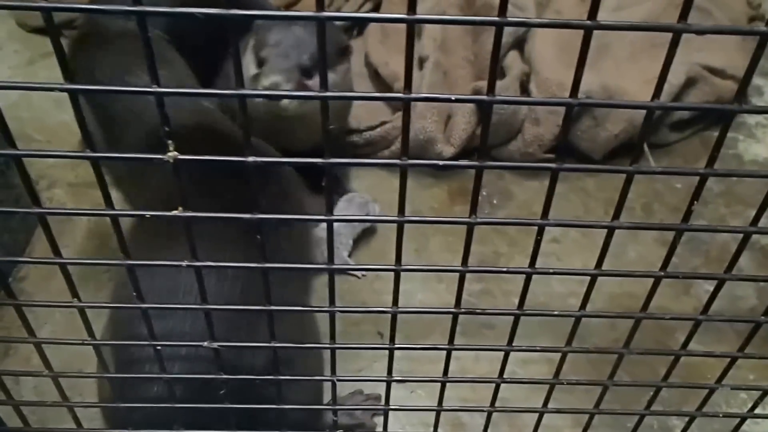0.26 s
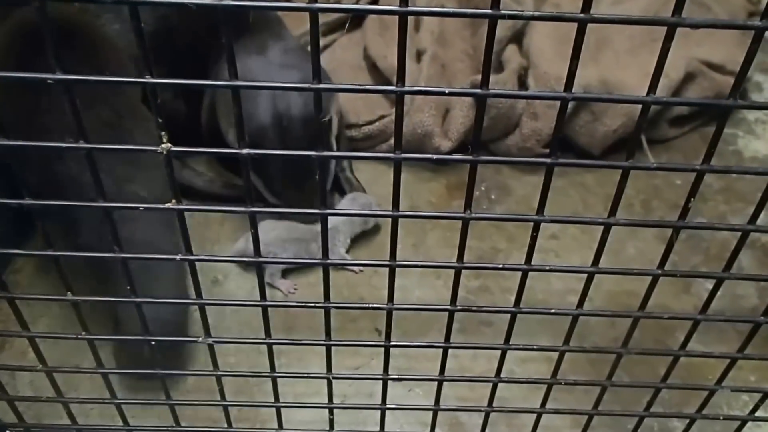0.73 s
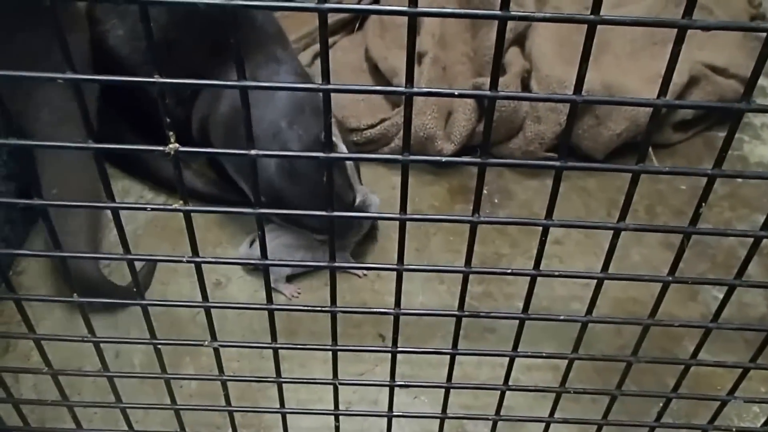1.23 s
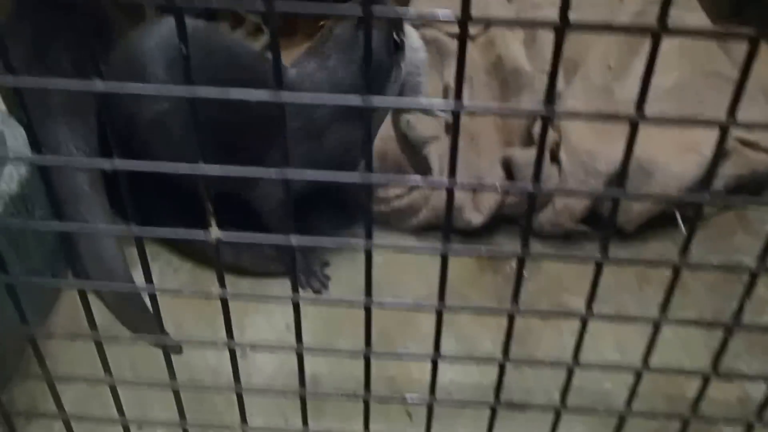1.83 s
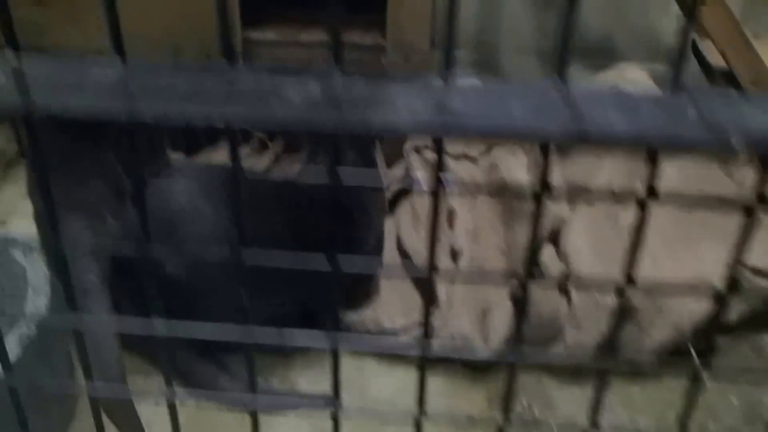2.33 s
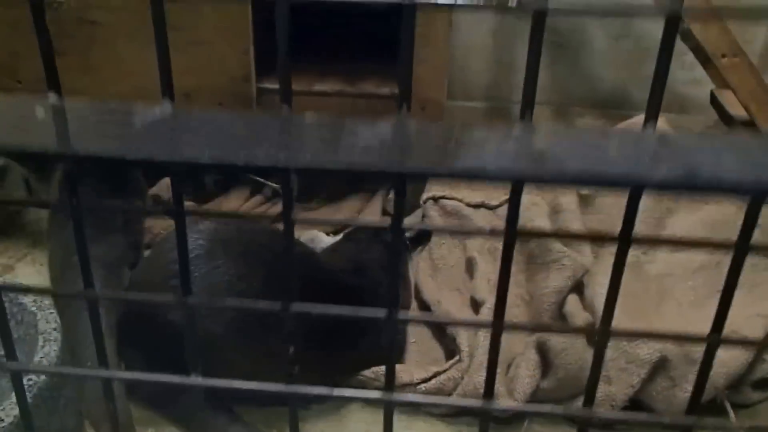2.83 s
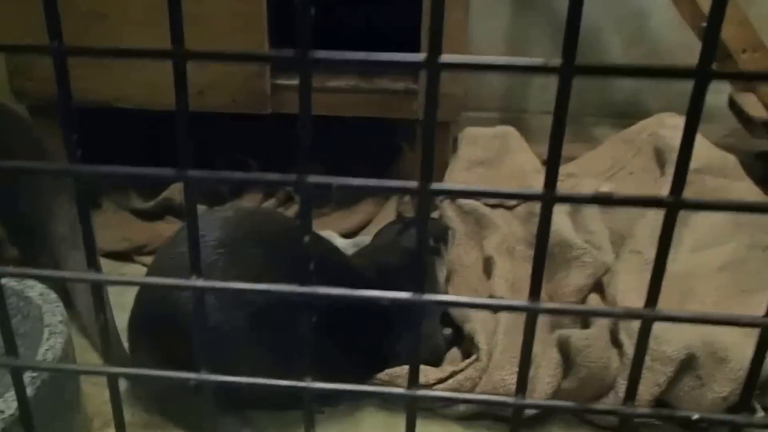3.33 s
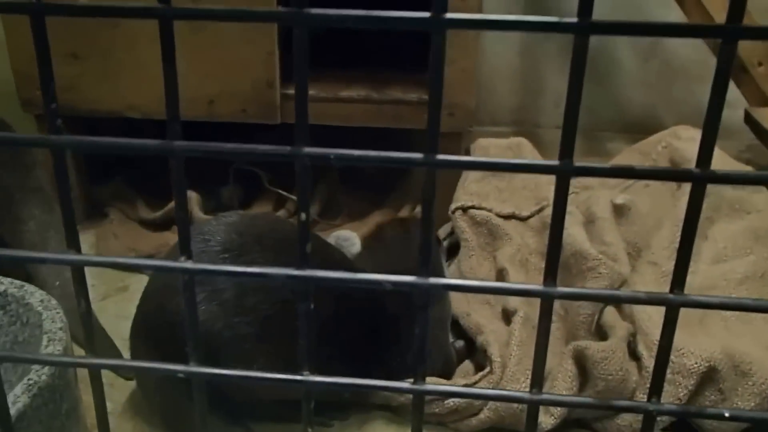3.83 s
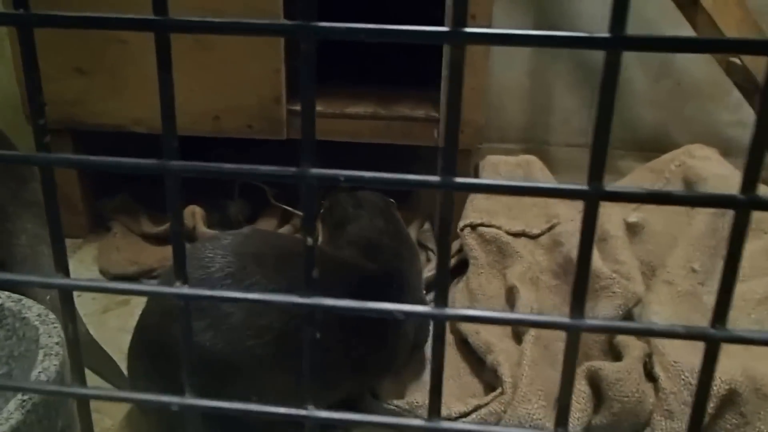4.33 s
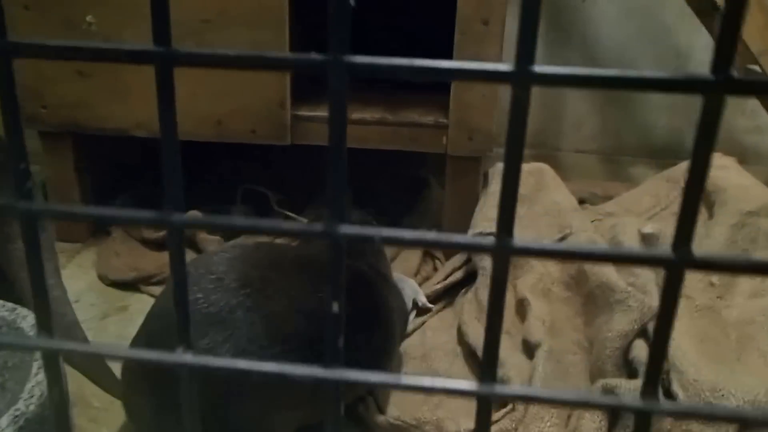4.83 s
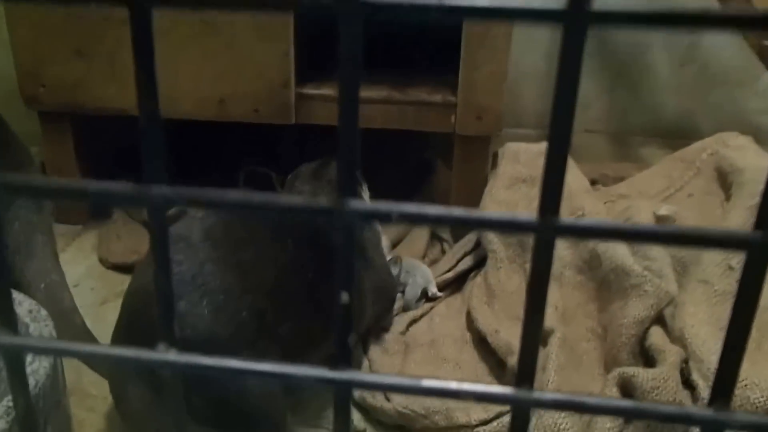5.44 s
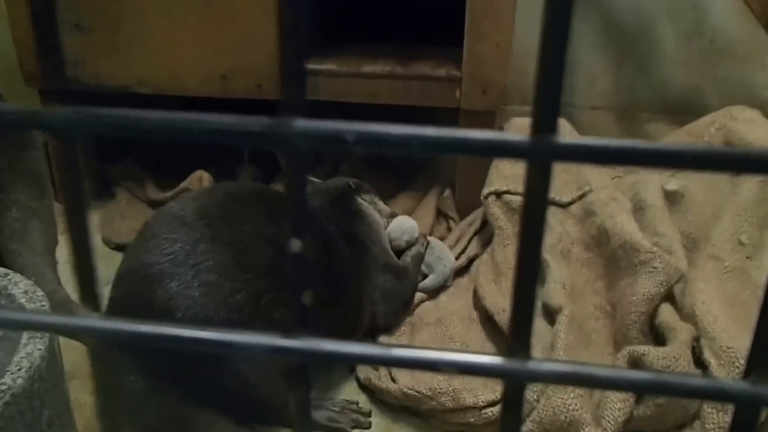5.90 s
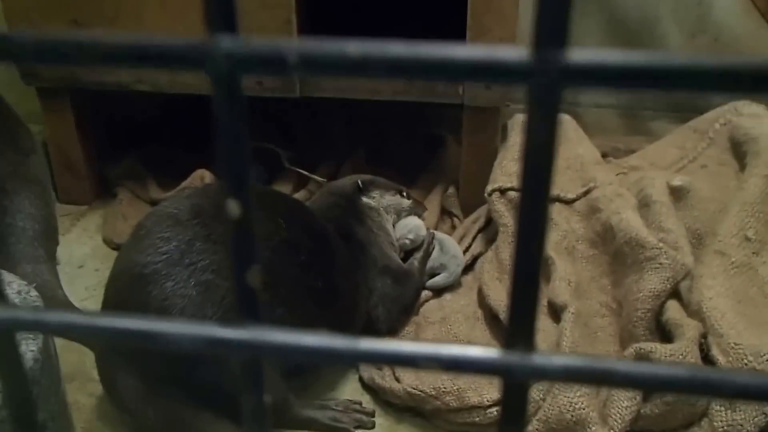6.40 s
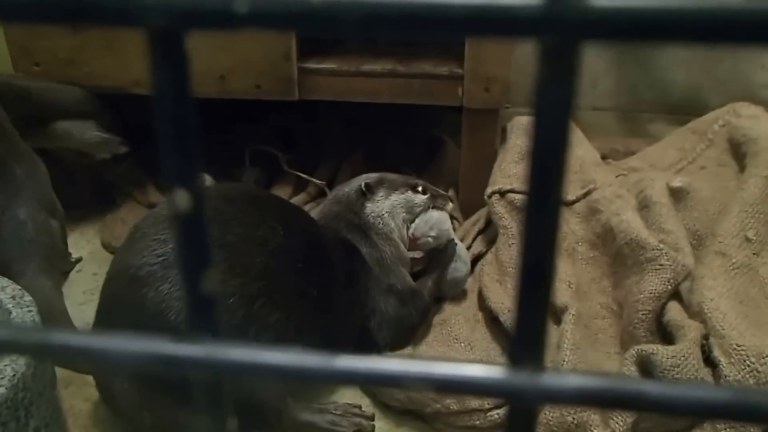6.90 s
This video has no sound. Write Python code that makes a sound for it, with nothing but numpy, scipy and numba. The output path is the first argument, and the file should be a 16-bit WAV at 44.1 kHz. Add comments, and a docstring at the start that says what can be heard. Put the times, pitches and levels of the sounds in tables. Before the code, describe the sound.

Otters beg with overlapping shrill whistles and raspy screams in a small concrete pen; a heavy door bangs shut over humming ventilation.

```python
"""Otters beg in a small concrete pen; the hard walls ring briefly, ventilation hums throughout.
From the start, overlapping cries: a shrill arched whistle breaks into a rasp, sinks to a nasal scream.
Near 2.1 s a hoarse squeak; at 2.3 s a heavy door knocks, then bangs shut from 2.6 s.
From 3 s on, soft held tones: low whimpers near 1.3 kHz and single scream overtones ringing out.
Gain control ducks under each loud cry; hum and a shrill hiss swell back in the pauses."""
import sys
import numpy as np
from scipy import signal
from scipy.fft import rfft, irfft, next_fast_len
from scipy.io import wavfile
from numba import njit

SR = 44100
rng = np.random.default_rng(int(sys.argv[2]) if len(sys.argv) > 2 else 0)


def generate_wav(signal):
    """Clip the signal to [-1, 1] and save it as 16-bit WAV at the path in sys.argv[1]."""
    frames = np.transpose(np.atleast_2d(signal))
    scaled = np.clip(frames, -1, 1) * 32767
    pcm = np.round(scaled).astype(np.int16)
    wavfile.write(sys.argv[1], SR, pcm)


N = 315756
TIME_S = np.arange(N) / SR
TOP_HZ = 15850

# ventilation spectrum: freq_hz, gain_db
VENT_SPECTRUM = [(15, -45), (25, -15), (70, -0.5), (86, 1.5), (102, -24), (138, -2), (209, -7.5),
                 (387, -4.5), (548, -12.5), (776, -7), (1100, -14), (1430, -8), (2420, -120)]
# door blows: start_s, level_db, contact_cutoff_hz, t60_s
DOOR_BLOWS = [(2.298, -25.5, 686, 0.36), (2.632, -5, 3600, 0.28), (2.678, -9, 2400, 0.3),
              (2.712, -6.5, 1230, 0.25), (2.752, -17, 600, 0.45)]
# door spectrum: freq_hz, gain_db
DOOR_SPECTRUM = [(24, -36), (40, -13), (202, -10), (280, 0), (327, -7.5), (539, -4), (1260, -8.5),
                 (1330, -9.5), (2770, -6.5), (4000, -8), (5200, -10), (8800, -120)]
# door panel modes: freq_hz, gain_db, t60_s
PANEL_MODES = [(57.5, -7.5, 2.5), (112.7, -7, 2.14), (183.5, -3.5, 1.2), (254, -16, 0.68), (285, -16, 0.6),
               (358, -16, 0.85), (457, -3.5, 0.7), (559.6, -4, 0.3), (580, -15, .55), (710, -11, 0.39),
               (910, -13, 0.6), (1286, -4, 0.54), (2020, -9, 0.24)]
# squeak envelope: time_s, level_db
SQUEAK_ENVELOPE = [(2.068, -39), (2.148, -22), (2.28, -36)]
# squeak resonances: freq_hz, width_hz, gain_db
SQUEAK_RESONANCES = [(2260, 88, 1.8), (2770, 104, 1.3), (3200, 82, 1.9)]
# held tones (low whimpers, high scream overtones): start_s, end_s, pitch_hz, level_db
HELD_TONES = [(3.003, 3.289, 1360, -44), (3.66, 3.779, 6470, -23.5), (6.218, 6.318, 6060, -27),
              (6.269, 6.371, 1416, -44), (6.401, 6.509, 1305, -32.5), (6.757, 6.903, 1317, -43.5),
              (6.93, 7.022, 1316, -33.5), (7.047, 7.152, 3773, -34)]
# whistles: crest_s, rise_s, fall_s, start_hz, crest_hz, crest_db, fall_swell_db, octave_db
WHISTLE_ARCHES = [(.33, 0.067, 0.055, 5250, 8770, -18.5, 0.5, 3),
                  (0.346, 0.056, .08, 7940, 8730, -23.5, 18, -12),
                  (.432, 0.055, .091, 3200, 8400, -1, -1.5, 1.5),
                  (.869, .036, 0.084, 5920, 8250, -17.5, 0, -12),
                  (1.233, 0.053, 0.054, 7550, 8900, -21, 9, -3),
                  (1.244, 0.029, .11, 5140, 9090, -23, 14.5, -4),
                  (1.591, 0.06, 0.077, 6120, 8970, -22, 10, -10),
                  (1.646, 0.032, 0.066, 5040, 8430, -13, -1.5, 1.5),
                  (1.822, 0.053, 0.085, 8320, 8710, -18, 5.5, 1),
                  (2.049, 0.039, 0.092, 5100, 8830, -17, 5, -16),
                  (2.173, 0.077, 0.072, 3670, 8300, -20.5, 19.5, -10),
                  (2.694, 0.038, 0.11, 8600, 8790, -24, 13, -10),
                  (2.736, 0.066, .084, 5000, 7890, -18.5, 9.5, -8),
                  (2.826, .038, 0.072, 6130, 8340, -16.5, 1, -3),
                  (3.001, 0.051, 0.07, 3960, 8930, -16, 2.5, -14),
                  (3.181, 0.056, 0.1, 4460, 8210, -17, 9, -3),
                  (3.296, 0.021, 0.11, 6706, 8760, -13, 6.5, -20),
                  (3.995, 0.041, 0.08, 8100, 8470, -17, 11.5, 2.5),
                  (4.014, 0.045, .16, 4610, 8990, -9, 6.5, 1),
                  (4.305, .022, 0.027, 5550, 5923, -9.5, -8, 7),
                  (4.604, 0.051, .081, 5927, 8370, -13, 2, -0.5),
                  (4.659, 0.061, 0.061, 8150, 8940, -19, 6, -1),
                  (4.753, 0.047, .14, 8440, 8420, -15.5, -1.5, 0),
                  (4.887, 0.065, .12, 5210, 8144, -11, 3.5, -6),
                  (5.141, 0.042, .064, 6780, 8800, -15, 3, -18),
                  (5.246, 0.023, 0.053, 6840, 8160, -25, 22.5, -19),
                  (5.669, 0.031, 0.14, 8440, 8540, -13, 7, 5.5),
                  (5.716, 0.034, 0.071, 4910, 7460, -11, 5, 0),
                  (6.485, .072, 0.057, 3560, 8220, -5.5, 1.5, 4.5),
                  (6.915, 0.051, 0.074, 4050, 8220, -15, 5.5, -10)]
# otter throat and mouth response: freq_hz, gain_db
THROAT_SPECTRUM = [(500, -62), (900, -21), (1500, -12), (2300, -12.5), (3300, -8.5), (4200, -10.5),
                   (5200, -2.5), (6200, 2.5), (7300, -1.5), (8300, -6), (9300, -5), (10500, -1),
                   (11700, -1), (13500, -11), (15600, -18)]
# screams: start_s, end_s, open_hz, body_hz, end_hz, level_db, change_db, rasp_share, bright_db
SCREAM_CRIES = [(0, 0.201, 1085, 1130, 692, -10.5, -11.5, 0.32, 5.5),
                (0.516, 0.729, 2260, 1440, 1437, -2.5, -6.5, 0.9, 7.5),
                (0.713, 1.154, 1806, 1214, 897.5, -3.5, -18, 0.47, 8),
                (1.281, 1.78, 4515, 1922, 1361, -17, -3.5, .95, 3),
                (1.4, 1.597, 1383, 1410, 1660, -27, 3, 0.77, -10),
                (1.894, 2.33, 2380, 1830, 1112, -15.5, 2, 1, 5),
                (2.219, 2.446, 1578, 1692, 1612, -18.5, -2, 0.92, -0.5),
                (2.35, 2.637, 1151, 1135, 1190, -26.5, 7, 1, -1.5),
                (2.439, 2.65, 1711, 1726, 1644, -19, 0.5, 0.86, -4.5),
                (2.771, 3.276, 2302, 1503, 1335, -17, -5, .85, 10),
                (3.05, 3.303, 2390, 1774, 1275, -19.5, 2, 0.77, 6.5),
                (3.261, 3.56, 3173, 1796, 1430, -9, -14.5, 0.97, 4.5),
                (3.301, 3.804, 1242, 1475, 1020, -12, -10, .68, 9.5),
                (3.401, 4.092, 2856, 1868, 1421, -22.5, 3, .72, 3),
                (3.768, 3.95, 1162, 1083, 1188, -16.5, -23, 0.67, 1.5),
                (4.059, 4.195, 5180, 2023, 1202, -21, 4, 0.28, 5),
                (4.101, 4.389, 3203, 2375, 1764, -7, -1, 1, 8.5),
                (4.38, 4.659, 1332, 1495, 842, -13, -4.5, 0.7, 7.5),
                (4.554, 4.941, 2144, 1810, 1327, -20, -4, 0.8, 1),
                (4.663, 4.749, 5150, 3070, 1466, -20, 7, .4, 6),
                (4.878, 5.102, 2402, 1692, 1642, -15.5, 9, 0.91, 12.5),
                (5.059, 5.447, 1800, 1531, 1421, -8.5, -4.5, 0.79, 10),
                (5.358, 5.688, 2010, 1758, 1170, -24, -6, 0.65, -6),
                (5.753, 5.969, 3127, 1642, 1365, -11, 8, 0.99, 7),
                (5.953, 6.253, 1527, 1100, 895.5, -7.5, -19, 0.54, 4.5),
                (5.985, 6.424, 2360, 1980, 1284, -26, -1, 0.78, -3.5),
                (6.535, 6.89, 2884, 1292, 840.6, -2, -33, .7, 7.5),
                (6.962, 7.17, 3133, 1774, 1782, -19, -6.5, 0.49, 0),
                (6.979, 7.16, 1386, 1416, 910, -18, -13, 0.62, 6)]
# pushes of effort in a scream: centre_s, half_length_s, pitch_lift_share, lift_db
EFFORT_SURGES = [(0.121, .015, .06, 4.5), (0.686, 0.024, .16, 3), (1.02, 0.038, .06, -2),
                 (1.475, 0.034, .11, -1), (2.517, 0.033, .17, 0.5), (3.62, .06, 0.037, 2),
                 (4.498, 0.035, .06, 0), (5.281, 0.02, .08, 0), (5.965, 0.016, .06, -2),
                 (6.635, .027, .19, 2.5)]


def undb(db):
    """Decibels to gain."""
    return 10 ** (np.asarray(db) / 20)


def unit(x):
    """Scale to rms 1."""
    return x / np.sqrt(np.mean(x ** 2) + 1e-20)


def colour(x, points):
    """Filter by (freq_hz, gain_db) points; white noise keeps its power."""
    hz, db = np.transpose(points)
    size = next_fast_len(len(x) + 2048)
    bins_hz = np.maximum(np.fft.rfftfreq(size, 1 / SR), 1)
    gain = unit(undb(np.interp(np.log(bins_hz), np.log(hz), db)))
    return irfft(rfft(x, size) * gain, size)[:len(x)]


def lowpass(x, hz, order=2):
    """Butterworth low-pass."""
    return signal.sosfilt(signal.butter(order, hz, fs=SR, output="sos"), x)


def zero_phase_lowpass(x, hz, order):
    """Low-pass forward, then backward."""
    return lowpass(lowpass(x, hz, order)[::-1], hz, order)[::-1]


def wander(t, rate_hz):
    """Gaussian random values joined by lines."""
    return np.interp((t - t[0]) * rate_hz, np.arange(len(t)), rng.standard_normal(len(t)))


def span(start_s, end_s, fade_s):
    """Sample times and soft-edged gate of an event."""
    t = TIME_S[(TIME_S >= start_s - fade_s / 2) & (TIME_S <= end_s + fade_s / 2)]
    edge_s = np.minimum(t - start_s, end_s - t)
    return t, np.sin(np.pi / 2 * np.clip(edge_s / fade_s + .5, 0, 1)) ** 2


def add(out, start_s, x):
    """Mix x into out from start_s."""
    i = int(round(start_s * SR))
    out[i:i + len(x)] += x[:len(out) - i]


def ventilation(air_db=-41, hum_db=-45, hum_hz=136):
    """Soft rushing air plus a wavering hum."""
    air = colour(rng.standard_normal(N), VENT_SPECTRUM) * undb(air_db + wander(TIME_S, 13))
    hum = np.sin(2 * np.pi * hum_hz * TIME_S + 2.2 * wander(TIME_S, 22))
    return air + hum * undb(hum_db + 2 * wander(TIME_S, 12))


def background_hiss(level_db=-35, swell_db=2):
    """Steady shrill hiss, coloured like the screams, gently swelling."""
    hiss = colour(rng.standard_normal(N), THROAT_SPECTRUM)
    return hiss * undb(level_db + swell_db * wander(TIME_S, 8.9))


def door(ring_db=-17, boom_db=-25, boom_hz=300, boom_t60_s=2.09):
    """Per blow: dense clatter, ringing panel modes, long low boom."""
    out, t = np.zeros(N), TIME_S[:int(1.5 * SR)]

    def burst(cutoff_hz, t60_s):
        noise = colour(rng.standard_normal(len(t)), DOOR_SPECTRUM)
        return unit(lowpass(noise, cutoff_hz)) * undb(-60 * t / t60_s)

    for start_s, level_db, contact_hz, t60_s in DOOR_BLOWS:
        clatter = burst(contact_hz, t60_s)
        ring = np.zeros(len(t))
        for hz, gain_db, mode_t60_s in PANEL_MODES:
            phase = 2 * np.pi * (hz * t + rng.random()) + .6 * wander(t, 25)
            ring += undb(gain_db - 60 * t / mode_t60_s) * np.sin(phase)
        ring *= undb(ring_db) / np.std(ring[:SR // 10])
        boom = undb(boom_db) * burst(boom_hz, boom_t60_s)
        add(out, start_s, undb(level_db) * (clatter + ring + boom))
    return out


def squeak():
    """Short hoarse note in a few narrow resonances."""
    out, note = np.zeros(N), 0
    time_s, level_db = np.transpose(SQUEAK_ENVELOPE)
    t, gate = span(time_s[0], time_s[-1], fade_s=.026)
    for hz, width_hz, gain_db in SQUEAK_RESONANCES:
        phase = 2 * np.pi * np.cumsum(hz + width_hz * wander(t, 720)) / SR
        note += undb(gain_db) * np.sin(phase)
    add(out, t[0], unit(note) * gate * undb(np.interp(t, time_s, level_db)))
    return out


def held_tones(quiver_share=.0182, sink_share=.0297, octave_db=-7, trim_db=1):
    """Low whimpers and single scream overtones ringing out: slowly sinking sine plus octave."""
    out = np.zeros(N)
    for start_s, end_s, pitch_hz, level_db in HELD_TONES:
        t, gate = span(start_s, end_s, fade_s=.03)
        progress = (t - start_s) / (end_s - start_s)
        glide = 1 + sink_share * (.5 - progress) + quiver_share * wander(t, 49.5)
        phase = 2 * np.pi * np.cumsum(pitch_hz * glide) / SR
        note = np.sin(phase) + undb(octave_db) * np.sin(2 * phase)
        add(out, t[0], np.sqrt(2) * note * gate * undb(level_db + trim_db))
    return out


def whistles(break_hz=5890, foot_hz=5400, rise_db_per_khz=1.54, shimmer_db=2.5, halo_db=-15):
    """Arches up to a crest, down to the voice break; pure on top, hoarse on the slopes."""
    out = np.zeros(N)
    for crest_s, rise_s, fall_s, start_hz, crest_hz, crest_db, swell_db, octave_db in WHISTLE_ARCHES:
        t, gate = span(crest_s - rise_s, crest_s + fall_s, fade_s=.014)
        rise_left = np.maximum(crest_s - t, 0) / rise_s
        fall = np.maximum(t - crest_s, 0) / fall_s
        slope = rise_left + fall
        drop = (np.sin(fall) / np.sin(1)) ** 2
        climb_hz = crest_hz - start_hz
        hz = crest_hz - climb_hz * rise_left ** 2.5 - (crest_hz - break_hz) * drop
        hz *= 1 + (.005 + .014 * slope) * wander(t, 1100) + .007 * wander(t, 110)
        phase = 2 * np.pi * np.cumsum(hz) / SR
        halo = wander(t, 1800) * np.sin(phase) + wander(t, 1800) * np.cos(phase)  # noise round the pitch
        halo *= undb(halo_db) * (.5 + 2 * slope)
        octave_gain = undb(octave_db - 12 * rise_left) / np.sqrt(1 + (2 * hz / 13500) ** 16)
        note = np.sin(phase) + octave_gain * np.sin(2 * phase) + halo
        db = crest_db - rise_db_per_khz * climb_hz / 1000 * rise_left + swell_db * drop
        db += shimmer_db * wander(t, 159)
        mouth = 1 / np.sqrt(1 + (foot_hz / hz) ** 16)  # a small mouth radiates the low foot poorly
        add(out, t[0], np.sqrt(2) * note * mouth * gate * undb(db))
    return out


def harmonics(t, hz, phase, strain_db=-5):
    """Scream partials; each fades and smears on its own as the head turns among the walls."""
    stack = np.zeros(len(t))
    for k in range(1, int(TOP_HZ / hz.min()) + 1):
        gain = undb(4.5 * wander(t, 28) - 1.5)
        smear_rad = k * hz / 9000 * wander(t, 240)
        if k == 1:  # a strained, high voice loses fundamental
            gain *= undb(strain_db * np.clip((hz - 1300) / 700, 0, 1))
        stack += gain * np.cos(k * phase + smear_rad) * (k * hz < TOP_HZ + 1000)
    return stack * 2 * np.sqrt(hz / SR)  # scaled to the power per Hz of white noise


def screams(drop_s=.05, clear_s=.0582, shimmer_db=2, hiss_hz=4600, split_hz=9000):
    """Gliding harmonic cries, harsh at onset; rasp makes cycles uneven and lets air hiss through."""
    out = np.zeros(N)
    for start_s, end_s, open_hz, body_hz, end_hz, level_db, change_db, held_rasp, bright_db in SCREAM_CRIES:
        t, gate = span(start_s, end_s, fade_s=.05)
        age_s = np.maximum(t - start_s, 0)
        progress = age_s / (end_s - start_s)
        hz = body_hz * (end_hz / body_hz) ** progress + (open_hz - body_hz) * np.exp(-age_s / drop_s)
        hz *= 1 + .011 * wander(t, 30)
        db = level_db + change_db * progress ** 2.18
        for centre_s, half_s, lift_share, lift_db in EFFORT_SURGES:
            push = np.exp(-((t - centre_s) / half_s) ** 2)
            hz *= 1 + lift_share * push
            db += lift_db * push
        rasp = held_rasp + (1 - held_rasp) * np.exp(-age_s / clear_s)
        rasp = np.clip(rasp + .12 * wander(t, 18), 0, 1) ** 3
        jitter = (.006 + .028 * rasp) * wander(t, 1100)
        wobble = (.005 + .012 * rasp) * wander(t, 60)
        phase = 2 * np.pi * np.cumsum(hz * (1 + jitter + wobble)) / SR
        tone = harmonics(t, hz, phase)
        tone *= 1 + .65 * rasp * wander(t, 300) * np.cos(phase / 2)  # cycles alternate in strength
        hiss = unit(rng.standard_normal(len(t)) * (1 + np.cos(phase)))
        hiss -= .39 * zero_phase_lowpass(hiss, hiss_hz, order=3)
        voice = np.sqrt(1 - .65 * rasp) * tone + (.13 + .5 * rasp) * hiss
        # a wider mouth favours the upper resonance
        low = zero_phase_lowpass(voice, split_hz, order=4)
        voice = low * undb(-bright_db / 2) + (voice - low) * undb(bright_db / 2)
        add(out, t[0], voice * gate * undb(db + shimmer_db * wander(t, 140)))
    return colour(out, THROAT_SPECTRUM)


def pen(x, echoes_db=-7, tail_db=-13, t60_s=1.0, echo_count=12):
    """Sharp echoes off floor and near walls, plus a short diffuse tail."""
    t = TIME_S[:SR * 3 // 4]
    response = np.zeros(len(t))
    lags = (SR * (.002 + .012 * rng.random(echo_count))).astype(int)
    response[lags] = undb(echoes_db) * rng.choice([-1, 1], echo_count) / np.sqrt(echo_count)
    noise = rng.standard_normal(len(t))
    low = lowpass(noise, 11500)
    decay = undb(-60 * t / t60_s)
    tail = (low + (noise - low) * decay) * decay  # air takes the treble twice as fast
    tail *= np.minimum(t / .01, 1)
    response += undb(tail_db) * tail / np.linalg.norm(tail)
    response[0] = 1
    return signal.fftconvolve(x, response / np.linalg.norm(response))[:N]


@njit
def follow(power, attack_s, release_s):
    """Attack/release power follower."""
    out, held = np.empty(len(power)), 0.
    for i in range(len(power)):
        held += (power[i] - held) / (SR * (attack_s if power[i] > held else release_s))
        out[i] = held
    return out


def scene():
    """Otters and door in the pen, over hiss and ventilation; dual mono."""
    near = whistles() + screams() + held_tones() + squeak() + door()
    mono = pen(near) + background_hiss() + ventilation()
    return np.array([mono, mono])


def record(dry, knee_db=-15, squeeze=.84, attack_s=.009, release_s=.051, makeup_db=1):
    """Gain control ducks loud sounds; then soft clip and top cut."""
    power = follow(dry[0] ** 2, attack_s, release_s)
    gain = undb(makeup_db) / (1 + power / undb(knee_db) ** 2) ** (squeeze / 2)
    top_cut = signal.ellip(10, .2, 80, TOP_HZ, fs=SR, output="sos")
    return signal.sosfilt(top_cut, np.tanh(dry * gain))


dry = scene()
out = record(dry)
generate_wav(out)
```